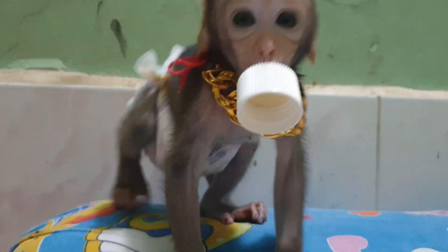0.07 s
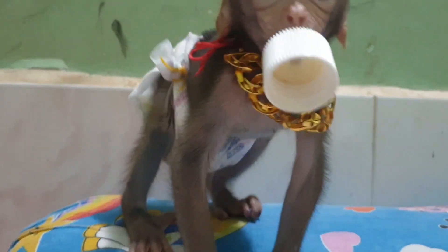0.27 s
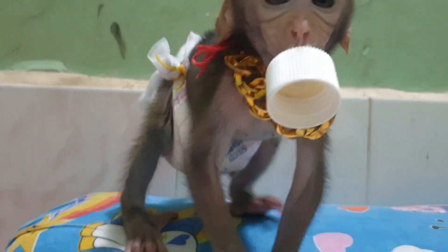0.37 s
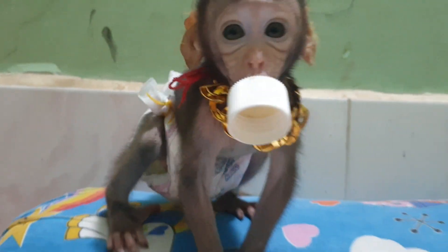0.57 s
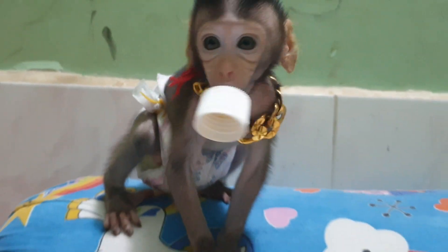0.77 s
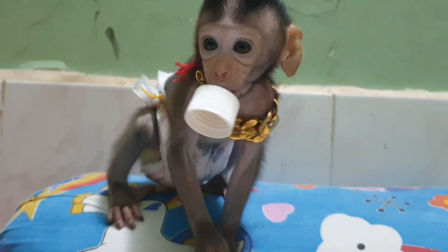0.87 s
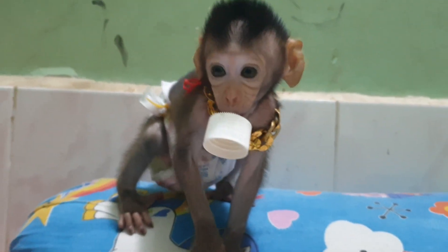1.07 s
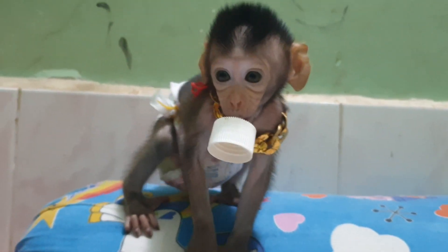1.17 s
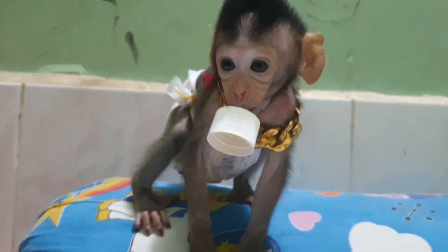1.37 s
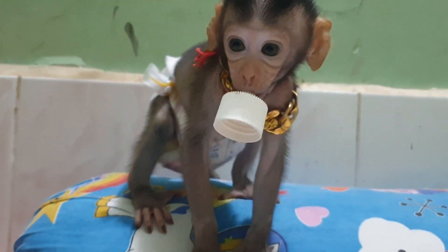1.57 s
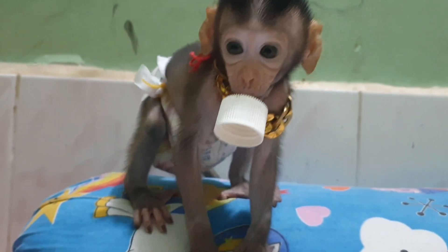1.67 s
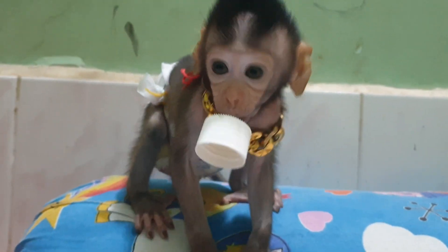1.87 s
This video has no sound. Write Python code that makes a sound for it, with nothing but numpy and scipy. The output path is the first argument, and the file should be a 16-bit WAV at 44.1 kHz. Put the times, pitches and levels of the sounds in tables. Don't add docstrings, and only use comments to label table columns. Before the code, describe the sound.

A baby monkey close to the microphone makes a short rising closed-mouth coo that bursts into one loud bright squeak, with a plastic cap clicking just before, then faint ticks and soft cushion thumps in a hissy tiled room.

```python
import sys
import numpy as np
from scipy import signal
from scipy.fft import rfft, irfft, next_fast_len
from scipy.io import wavfile
from scipy.ndimage import map_coordinates

SR = 44100
rng = np.random.default_rng(int(sys.argv[2]) if len(sys.argv) > 2 else 0)


def store_wav(level_fs):
    pcm = np.round(np.clip(np.atleast_2d(level_fs), -1, 1) * 32767)
    wavfile.write(sys.argv[1], SR, pcm.T.astype(np.int16))


def volts_from_db(level):
    exponent = np.asarray(level, float) / 20
    return 10 ** exponent


N = 83790

# (frequency [Hz], density [dB per Hz])
HISS_COLOUR = [(100, -21), (135, -5.5), (1060, -7.5), (1500, -7.5), (2800, -19), (3600, -25.5), (4600, -20),
               (15500, -29)]
# (time [s], lift [dB])
TREBLE_LIFT = [
    (0, 11.5),
    (.45, 1.5),
    (1, -0.5),
    (1.2, 5),
    (1.9, 2.5),
]
# (frequency [Hz], width [Hz], level [dB])
RUMBLE = [(47.1, 9, -59), (67.9, 10.8, -59), (100.16, 8, -60.5), (37.8, 6.6, -84), (122.4, 35, -68)]
# (frequency [Hz], left lead [rad], left over right [dB], likeness [0-1])
ROOM_STEREO = [(50, .34, -1.3, .99), (200, .33, -1.3, .97), (600, .55, -.5, .82), (1000, 1.32, -1, .74),
               (1600, 2.8, -3.4, .75), (2000, 3.56, -5.3, .57), (3000, 7.1, -6, .35), (3500, 9, -4, .4),
               (5000, 10.8, -4.2, .15), (8000, 18, -5.5, .15), (12000, 27, -10, .12), (16000, 36, -10, .1)]
# (start [s], length [s], centre [Hz], width [Hz])
RUSTLES = [(-.01, .062, 6200, 300), (.01, .04, 5400, 300), (-.01, .06, 11900, 600), (0, .053, 10400, 300),
           (0, .05, 2900, 120), (.055, .04, 7500, 2000), (.944, .024, 5700, 60), (1.69, .16, 4450, 150),
           (1.68, .15, 2050, 250), (1.69, .14, 5850, 250), (1.83, .1, 7400, 2000), (1.09, .13, 5500, 2500),
           (1.28, .16, 7200, 1500), (1.84, .08, 11500, 2000)]
RUSTLE_LEVELS = [-57.5, -60.5, -64, -65, -57, -58, -67.5, -70.5, -69, -76.5, -59, -70.5, -71, -70]
# (time [s], pitch [Hz], level [dB], loss per harmonic above the second [dB], sign ignored)
COO = [(0, 1120, -48.5, -9), (.04, 1151, -47, -14), (.066, 1180, -41.5, -4), (.12, 1198, -38.5, 3),
       (.165, 1215, -33, -1.5), (.205, 1228, -33.5, 4), (.214, 1210, -30.5, -7), (.219, 1230, -85, -4)]
COO_HARMONICS = [-0.5, -16.5, -11.5, -58, -56, -52, -53, -31, -48, -27, -27, -27, -33]
# (time [s], pitch [Hz], level [dB], loss per harmonic above the second [dB], sign ignored)
SQUEAK = [(.2135, 1145, -63.5, 3.5), (.217, 1216, -21.5, 0.6), (.224, 1277, -25.5, -0.5),
          (.232, 1294, -22, 0), (.243, 1254, -23.5, 0.5), (.255, 1166, -29.5, -2), (.262, 1095, -34.5, 0),
          (.272, 970, -34.5, 5), (.279, 920, -72, 2)]
# (frequency [Hz], width [Hz], level [dB])
MOUTH = [(1380, 197, 6.5), (2300, 324, -1.5), (3970, 1150, -11.5), (5014, 137, 6), (6530, 730, -9.5),
         (8956, 260, -8), (10280, 200, -2.5), (11660, 820, -1), (12610, 285, 7), (14300, 1000, -13),
         (15550, 700, -26)]
# (time [s], level [dB])
KNOCKS = [
    (0.043, -42),
    (.050, -28),
]
# (time [s], level [dB], length [s], centre [Hz])
TICKS = [
    (0.0529, -30.5, 0.0098, 6940),
    (0.52, -52, 0.0077, 5900),
    (.991, -62, 0.0053, 10100),
    (1.072, -57, 0.0066, 2420),
    (1.2, -68, 0.013, 8000),
    (1.858, -55.5, 0.044, 6960),
]
# (time [s], level [dB], frequency [Hz])
THUMPS = [
    (0.523, -44, 121),
    (0.924, -40, 90),
    (1.559, -54.5, 234),
]
# (frequency [Hz], left lead [rad], left over right [dB])
ANIMAL_STEREO = [(0, 0, 0), (1270, .9, -2), (2540, 1.2, -6.5), (3810, 4.2, -6.3), (5080, 5.55, -7.2),
                 (6350, 8.6, -4.7), (8890, 11.6, -4.5), (10160, 12.8, -3), (11430, 12.55, 1),
                 (12700, 15.5, -7), (16000, 19.5, -2)]
# (frequency [Hz], time to fall 60 dB [s])
TILES = [(500, 0.87), (1300, 0.47), (5000, 0.41), (12000, 0.32), (16000, 0.19)]
# (delay [s], left [dB], right [dB])
WALLS = [(.006, -12, -18), (0.011, -32, -21), (.024, -14, -24.5), (.046, -20.5, -21)]

JITTER, SHIMMER_DB, BREATH_DB = .0015, 1.5, -34
HISS_DB, HISS_TOP_HZ = -56, 15750
HOLLOW_HZ, HOLLOW_T60 = 1263, 0.031
ROOM_DB = -15.5
TOP_HZ = 16400


def unit(x):
    return x / np.sqrt(np.mean(x ** 2) + 1e-20)


def along(points, hz):
    f, v = np.transpose(points)
    return np.interp(np.log(hz + 1), np.log(f + 1), v)


def wobble(rate):
    knots = rng.standard_normal(int(N * rate / SR) + 4)
    return map_coordinates(knots, [np.arange(N) * rate / SR])


def filtered(x, response):
    m = next_fast_len(N + SR // 2)
    return irfft(rfft(x, m) * response(np.fft.rfftfreq(m, 1 / SR)), m)[..., :N]


def peak(f, hz, width):
    return 1j * f * width / (hz * hz - f * f + 1j * f * width)


def lead(f, table):
    hz, rad, db = np.transpose(table)[:3]
    half = np.array([[1], [-1]]) / 2
    phase = np.exp(1j * half * np.interp(f, hz, rad))
    return phase * volts_from_db(half * np.interp(f, hz, db))


def room_noise(response):
    hz, _, _, alike = np.transpose(ROOM_STEREO)

    def shares(f):
        angle = np.arccos(np.interp(f, hz, alike)) / 2
        return np.array([np.cos(angle), np.sin(angle)])

    mid, side = filtered(rng.standard_normal((2, N)), shares)
    both = np.array([mid + side, mid - side])
    return unit(filtered(both, lambda f: response(f) * lead(f, ROOM_STEREO)))


def room_hiss():
    s, db = np.transpose(TREBLE_LIFT)
    lift = volts_from_db(np.interp(np.arange(N) / SR, s, db))
    hiss = room_noise(lambda f: volts_from_db(along(HISS_COLOUR, f)) * (f < HISS_TOP_HZ))
    treble = filtered(hiss, lambda f: 1 / (1 + (7000 / (f + 1)) ** 4))
    return (hiss + treble * (lift - 1)) * volts_from_db(HISS_DB + 1.8 * wobble(5.1))


def hum_and_fan():
    return sum(volts_from_db(db) * room_noise(lambda f: peak(f, hz, w) ** 2) for hz, w, db in RUMBLE)


def rustles():
    t, out = np.arange(N) / SR, np.zeros(N)
    for (s, length, hz, width), db in zip(RUSTLES, RUSTLE_LEVELS):
        swell = np.sin(np.pi * np.clip((t - s) / length, 0, 1)) ** 0.22
        swell = swell * volts_from_db(2.4 * wobble(70))
        noise = unit(filtered(rng.standard_normal(N), lambda f: peak(f, hz, width) ** 2))
        out += volts_from_db(db) * swell * noise
    return out


def voice(rows, harmonics_db):
    s, hz, db, loss = np.transpose(rows)
    t = np.arange(N) / SR
    loss_db = np.interp(t, s, np.abs(loss))
    pitch = np.interp(t, s, hz) * (1 + JITTER * wobble(152.8))
    phase = 2 * np.pi * np.cumsum(pitch) / SR
    tone = np.zeros(N)
    for k, level in enumerate(harmonics_db):
        level_db = level - max(k - 1, 0) * loss_db + SHIMMER_DB * wobble(60.7)
        tone += volts_from_db(level_db) * np.sin((k + 1) * phase + k * k)
    breath = volts_from_db(BREATH_DB) * (1 + np.cos(phase)) * rng.standard_normal(N)
    return volts_from_db(np.interp(t, s, db, right=-200)) * np.sqrt(2) * (tone + breath)


def coo():
    return voice(COO, COO_HARMONICS)


def ring(start, db, hz, t60, rise):
    t = np.arange(N) / SR - start
    since = np.clip(t, 0, 2)
    envelope = volts_from_db(db - 60 * since / t60) * (1 - np.exp(-since / rise))
    return envelope * np.sin(2 * np.pi * hz * t)


def cap_knocks():
    return sum(ring(s, db + 6.5, HOLLOW_HZ, HOLLOW_T60, .0016) for s, db in KNOCKS)


def ticks():
    t, out = np.arange(N) / SR, np.zeros(N)
    for s, db, length, hz in TICKS:
        u = np.clip(t - s, 0, 2) / length
        burst = 7 * u * np.exp(-7 * u) * rng.standard_normal(N)
        out += volts_from_db(db + 12.5) * filtered(burst, lambda f: peak(f, hz, 1.7 * hz))
    return out


def squeak():
    def mouth(f):
        return sum((-1) ** k * volts_from_db(db) * peak(f, hz, w) for k, (hz, w, db) in enumerate(MOUTH))

    return filtered(voice(SQUEAK, np.zeros(13)), mouth)


def thumps():
    return sum(ring(s, db + 6, hz, .076, .004) for s, db, hz in THUMPS)


def room(x):
    hz, t, z = signal.stft(rng.standard_normal((2, SR // 2)), SR, nperseg=256)
    decay = volts_from_db(-60 * t / along(TILES, hz)[:, None])
    tail = signal.istft(z * decay, SR, nperseg=256)[1]
    answer = volts_from_db(ROOM_DB) * np.pad(tail, ((0, 0), (300, 0))) / np.linalg.norm(tail[0])
    for s, left_db, right_db in WALLS:
        answer[:, round(s * SR)] += volts_from_db([left_db, right_db])
    return signal.fftconvolve(x[None], answer, axes=1)[:, :N]


def scene():
    background = room_hiss() + hum_and_fan()
    near = rustles() + coo() + cap_knocks() + ticks() + squeak() + thumps()
    direct = filtered(near, lambda f: lead(f, ANIMAL_STEREO))
    return direct + room(near) + background


def low_pass(x):
    return signal.sosfilt(signal.butter(12, 16480, fs=SR, output="sos"), x)


def record(dry):
    mix = filtered(dry, lambda f: (f > 28) / (1 + (f / TOP_HZ) ** 60))
    return low_pass(mix)


dry = scene()
out = record(dry)
store_wav(out)
```